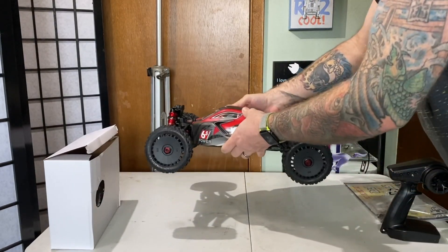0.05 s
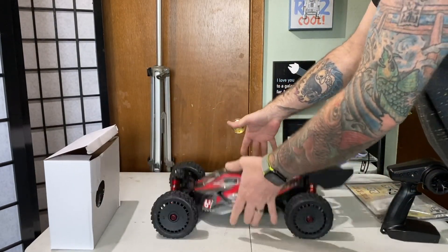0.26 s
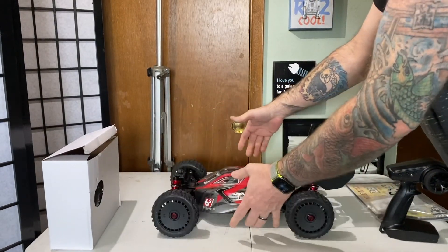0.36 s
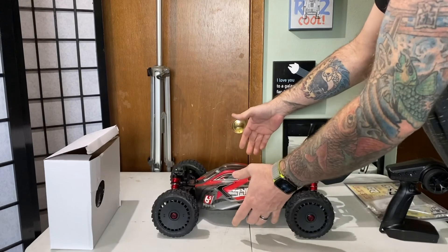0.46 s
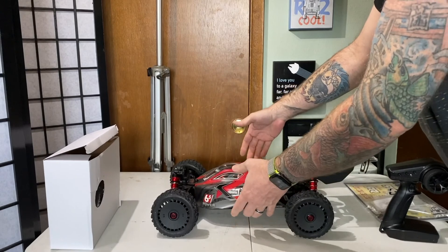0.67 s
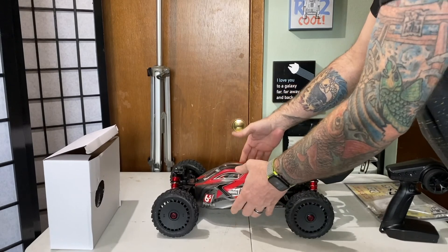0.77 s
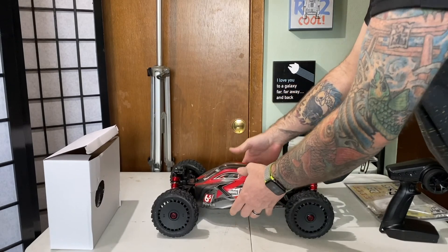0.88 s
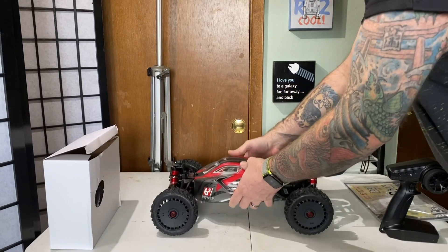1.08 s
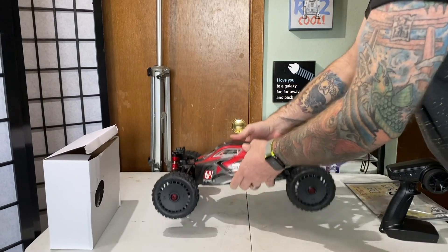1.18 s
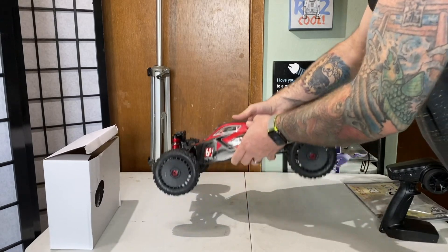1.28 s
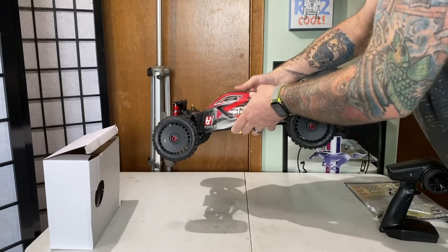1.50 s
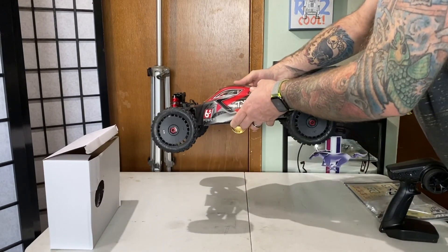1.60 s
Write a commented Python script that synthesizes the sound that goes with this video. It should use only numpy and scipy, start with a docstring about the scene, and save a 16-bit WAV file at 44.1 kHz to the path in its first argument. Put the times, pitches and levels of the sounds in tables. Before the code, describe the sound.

A metal-bodied toy car drops onto a table with a loud clattering thump in a small room

```python
"""In a small room, a metal-bodied toy car slides out of two hands and lands on a table.
Hard contacts ring its chassis modes, soft tyre pushes excite the table top, and loose parts chatter.
The hands then grip it with ticks, knocks and granular rubbing and lift it away, over air noise and fan hum.
Impacts are forces convolved with decaying noise or fed to resonators; the landing overloads the microphone."""
import sys
import numpy as np
from scipy import signal
from scipy.io import wavfile
from scipy.ndimage import uniform_filter1d, minimum_filter1d

SR = 44100
rng = np.random.default_rng(int(sys.argv[2]) if len(sys.argv) > 2 else 0)


def int16_out(signal):
    """Quantize to a 16-bit WAV file."""
    q = np.round(np.clip(np.atleast_2d(signal).T, -1, 1) * 32767)
    wavfile.write(sys.argv[1], SR, q.astype(np.int16))


N = 72765


def from_db(db):
    """Logarithmic level: 20 dB is a factor of ten in amplitude."""
    return 10 ** (np.asarray(db) / 20)


def seconds():
    """Uniform sampling: the time of every sample in seconds."""
    return np.arange(N) / SR


def at_hz(points, hz):
    """Logarithmic pitch scale: interpolate a table over log frequency."""
    f, v = np.transpose(points)
    return np.interp(np.log(hz), np.log(f), v)


def fade(t, t60):
    """Exponential decay: the level falls by 60 dB in t60 and is full before time zero."""
    return np.exp(-np.log(1000) * np.maximum(t, 0) / t60)


def unit(x):
    """Energy normalisation: scale the sum of squares to one."""
    return x / np.sqrt(np.sum(x ** 2) + 1e-30)


def bands(colour, pair):
    """Band analysis: split two unrelated white signals into (Hz, amplitude share, band)."""
    step = np.linspace(0, 1, 37)
    edges = 22 + 17000 * step ** 3 + 700 * step  # Hz; relatively narrower towards the treble
    centres = np.sqrt(edges[1:] * edges[:-1])
    # a density per Hz becomes a band amplitude through the root of the bandwidth
    shares = unit(from_db(at_hz(colour, centres)) * np.sqrt(np.diff(edges)))
    out = []
    for k, (hz, share) in enumerate(zip(centres, shares)):
        bandpass = signal.butter(2, edges[k:k + 2], "band", fs=SR, output="sos")
        # neighbouring bands take different sources
        out.append((hz, share, signal.sosfilt(bandpass, pair[k % 2] + 1e-18)))
    return out


def coloured(colour, pair):
    """Spectral shaping: sum the weighted bands to a signal of rms about 1."""
    return np.sqrt(N) * sum(share * unit(band) for hz, share, band in bands(colour, pair))


def clicks(rows):
    """Ideal impulse: one single-sample force for each (s, dB)."""
    force = np.zeros(N)
    for s, db in rows:
        force[int(np.clip(s * SR, 0, N - 1))] += from_db(db)
    return force


def pushes(rows):
    """Finite contact time: one smooth push for each (s, dB, contact s), duller when longer."""
    force = np.zeros(N)
    for s, db, contact_s in rows:
        age = np.maximum(np.arange(N) - int(s * SR), 0) / (contact_s * SR)  # in contact times
        push = age * np.exp(-2 * np.pi * np.minimum(age, 20))
        force += from_db(db) * push / push.sum()
    return force


def ring(force, modes):
    """Modal superposition: a force drives damped resonators (Hz, dB, t60 s) of alternating sign."""
    out = np.zeros(N)
    for k, (hz, db, t60) in enumerate(modes):
        r = fade(1 / SR, t60)
        w = 2 * np.pi * hz / SR
        mode = signal.lfilter([0, np.sin(w)], [1, -2 * r * np.cos(w), r * r], force + 1e-18)
        out += (-1) ** k * from_db(db) * mode
    return out


# reverberation time of the room by frequency: f/Hz, t60/s
ROOM_T60 = [(60, 0.22), (250, 0.39), (1000, 0.23), (3000, 0.27), (8000, 0.22), (15000, 0.16)]
ROOM_BUILD_S = 0.016  # time constant with which the reverberation grows
CRACK_T60_S = 0.0038


def burst(force, colour, t60, room_db, crack=0):
    """Impulse response: dense damped modes as decaying noise, with a crack and a banded room tail."""
    t = seconds()[:N // 3]
    room = from_db(room_db) * (1 - np.exp(-t / ROOM_BUILD_S))
    direct = fade(t, t60) + crack * fade(t, CRACK_T60_S)
    answer = 0
    for hz, share, band in bands(colour, rng.standard_normal((2, 2 * len(t)))):
        envelope = np.hypot(direct, room * fade(t, at_hz(ROOM_T60, hz)))
        settled = band[len(t):]  # skip the band filter's own onset
        answer = answer + share * np.linalg.norm(envelope) * unit(settled * envelope)
    return signal.fftconvolve(force, answer)[:N]


GRAIN_SPREAD_DB = 3.5


def grains(per_s):
    """Stick-slip friction: random slips of uneven size and either sign, about unit strength each."""
    excess = np.minimum(rng.exponential(1, N), 4) - 1
    sizes = from_db(GRAIN_SPREAD_DB * excess) * rng.choice([-1, 1], N)
    return sizes * (rng.random(N) < per_s / SR)


def friction(colour, per_s):
    """Granular excitation: a steady stream of coloured slips, rms about 1."""
    return coloured(colour, [grains(per_s), grains(per_s)])


# hard contacts of chassis and suspension in the landing: t/s, relative level/dB
CLACKS = [(0.222, -19), (0.232, -15.5), (0.238, -4), (0.2422, 8.5), (0.2445, 3.5), (0.2525, -4),
          (0.257, 3.5), (0.263, -39)]
# spectrum of the clack: f/Hz, relative level/dB per Hz
CLACK_COLOUR = [(200, -14.5), (800, 3.5), (1900, -10), (2600, 3.5), (3500, 1.5), (4400, -3), (5600, -14),
                (8500, -29.5), (15000, -41)]
CLACK_DB, CLACK_T60_S, CLACK_ROOM_DB, CLACK_CRACK_DB = -11, 0.055, -15, -5
# chassis modes: f/Hz, relative level/dB, t60/s
CHASSIS_MODES = [(1648, 0, 0.28), (2190, -10.5, 0.25), (2703, 2, .16), (2789, -13.5, 0.078),
                 (3256, -17.5, .2), (3034, 1, 0.067), (3740, -17, 0.6), (4280, -26.5, .2),
                 (4290, -19.5, 0.084), (4770, -27, 0.33), (6640, -25.5, .18)]
CHASSIS_DB = -32.5


def chassis():
    """Impulsive excitation: hard contacts crack and set the modes of the metal frame ringing."""
    force = clicks(CLACKS)
    clack = burst(force, CLACK_COLOUR, CLACK_T60_S, CLACK_ROOM_DB, from_db(CLACK_CRACK_DB))
    return from_db(CLACK_DB) * clack + from_db(CHASSIS_DB) * ring(force, CHASSIS_MODES)


# tyres hit the table, the springs bottom out and the car settles: t/s, relative level/dB, contact/s
THUMPS = [(0.246, 8, 0.00069), (0.2535, -11, 0.0008), (0.264, 7, 0.0016), (0.275, 0, 0.0015),
          (0.286, -7, 0.0011), (0.302, 0, .0025), (0.338, -19, .001), (0.357, -7.5, 0.0013),
          (0.372, -12, 0.00053), (0.388, -23.5, 0.00091), (0.409, -15, .0012)]
# spectrum of the boom: f/Hz, relative level/dB per Hz
THUMP_COLOUR = [(30, -12.5), (70, -11), (140, 1), (260, -6.5), (400, -7.5), (800, -9.5), (1300, -12),
                (2500, -15), (6000, -55)]
THUMP_DB, THUMP_T60_S, THUMP_ROOM_DB = -8, 0.083, -7
# table top modes: f/Hz, relative level/dB, t60/s
TABLE_MODES = [(144.2, -6.5, 0.39), (178.2, -19.5, 0.21), (224.2, -4.5, 0.24), (304.3, -6.5, 0.46),
               (319.6, -16, .3), (444.2, -14.5, .3), (552.9, -10.5, 0.28), (685, -14.5, 0.093),
               (770.4, -9, 0.22), (834.6, -5.5, 0.2), (899.5, -7, 0.16), (1103, -15, 0.15)]
TABLE_DB = -13.5
# the car's full weight heaves the table, then rocks on its springs: t/s, relative level/dB, contact/s
SLAM = [(0.2635, -1.5, 0.0044), (0.405, -15.5, 0.013)]
# deep modes of the table on its legs: f/Hz, relative level/dB, t60/s
TABLE_DEEP_MODES = [(52, -6.5, 0.23), (81.1, -6, .27), (127.7, -1, 0.15)]


def table():
    """Plate resonance: soft tyre pushes boom in the table top; the car's weight heaves the table."""
    force = pushes(THUMPS)
    boom = from_db(THUMP_DB) * burst(force, THUMP_COLOUR, THUMP_T60_S, THUMP_ROOM_DB)
    top = from_db(TABLE_DB) * ring(force, TABLE_MODES)
    heave = ring(pushes(SLAM), TABLE_DEEP_MODES)
    return boom + top - heave


# spectrum of the rattle: f/Hz, relative level/dB per Hz
RATTLE_COLOUR = [(150, 0.5), (450, 8), (1200, 5.5), (2000, 0.5), (3500, -3), (5600, -8), (9000, -9.5),
                 (11000, -23.5), (15000, -15)]
RATTLE_START_S, RATTLE_PER_S, RATTLE_T60_S = .25, 410, 0.25
RATTLE_END_S, RATTLE_STOP_T60_S = 0.39, .1  # a further decay from here on
RATTLE_DB, RATTLE_SPREAD_DB = -3.5, 13  # strongest hit before the decays, range below it
RATTLE_GRAIN_T60_S, RATTLE_ROOM_DB = 0.047, -11


def rattle():
    """Repeated impacts: loose parts chatter ever more weakly and stop as the springs settle."""
    t = seconds()
    age = t - RATTLE_START_S
    shake = (age > 0) * fade(age, RATTLE_T60_S) * fade(t - RATTLE_END_S, RATTLE_STOP_T60_S)
    draws = rng.random((300, 2))
    # one hit at a random moment in each equal slot
    times = RATTLE_START_S + (np.arange(len(draws)) + draws[:, 0]) / RATTLE_PER_S
    levels = RATTLE_DB - RATTLE_SPREAD_DB * draws[:, 1]
    force = shake * clicks(zip(times, levels)) * rng.choice([-1, 1], N)
    return burst(force, RATTLE_COLOUR, RATTLE_GRAIN_T60_S, RATTLE_ROOM_DB)


# fingers and loose parts tick on the shell: t/s, relative level/dB, contact/s
TICKS = [(0.1262, -21.5, 0.0003), (0.159, -19, 0.00036), (0.165, -30, 0.00055), (0.212, -28, 0.000032),
         (0.675, -34, 0.000023), (0.7124, -25.5, 0.00027), (0.8293, -41, 0.000035),
         (0.8565, -24.5, 0.000055), (0.863, -49, 0.000041), (0.9715, -26.5, 0.00009),
         (0.978, -29.5, 0.00058), (1.0593, -38, 0.000091), (1.1431, -29.5, 0.00023), (1.185, -29, 0.00042),
         (1.3182, -30.5, 0.00028)]
# spectrum of the ticks: f/Hz, relative level/dB per Hz
TICK_COLOUR = [(200, -26.5), (1200, -7.5), (2000, -7), (2800, -3.5), (4800, -3.5), (6300, -7), (8300, -1.5),
               (10500, -11), (15000, -12.5)]
TICK_DB, TICK_T60_S, TICK_ROOM_DB, TICK_CRACK_DB = -4, 0.069, -4.5, -7.5
# modes of the thin shell: f/Hz, relative level/dB, t60/s
SHELL_MODES = [(1644, -4, 0.249), (1930, -1.5, 0.094), (2163, 1.5, 0.1), (4450, -7.5, .14),
               (5150, -8, 0.15), (5540, -12.5, 0.14), (7860, -5, .08)]
TICK_RING_DB = -20
# the gripped shell creaks faintly as the car is lifted, one row: start t/s, length/s, relative level/dB
CREAK = (1.145, 0.058, -38.5)
CREAK_SLIPS_PER_S = 300


def shell():
    """Thin-shell resonance: bright ticks as the hands let go and regrip; slips in the grip creak."""
    t = seconds()
    force = pushes(TICKS)
    ticks = burst(force, TICK_COLOUR, TICK_T60_S, TICK_ROOM_DB, from_db(TICK_CRACK_DB))
    start, length, db = CREAK
    slips = from_db(db) * grains(CREAK_SLIPS_PER_S) * (t > start) * (t < start + length)
    return from_db(TICK_DB) * ticks + from_db(TICK_RING_DB) * ring(force + slips, SHELL_MODES)


# fingertips knock dully on the hollow body: t/s, relative level/dB
KNOCKS = [(0.111, -30.5), (0.128, -13), (0.168, -25), (0.875, -26.5), (0.918, -28), (0.928, -17.5),
          (1.0735, -23.5), (1.128, -25.5), (1.18, -28.5), (1.228, -28), (1.324, -30)]
# spectrum of the knocks: f/Hz, relative level/dB per Hz
KNOCK_COLOUR = [(100, -13.5), (280, 0.5), (450, 8.5), (750, 0.5), (1300, -5.5), (3000, -31), (15000, -25.5)]
KNOCK_DB, KNOCK_T60_S, KNOCK_ROOM_DB = -14, 0.028, -3
# modes of the hollow body: f/Hz, relative level/dB, t60/s
BODY_MODES = [(380, -15.5, 0.04), (469.3, 2.5, 0.19), (552.5, -2.5, 0.16), (618, -9, 0.22),
              (748, -7.5, 0.2)]
BODY_DB = -19


def body():
    """Hollow-body resonance: fingertip knocks excite low, strongly damped modes."""
    force = clicks(KNOCKS)
    knock = burst(force, KNOCK_COLOUR, KNOCK_T60_S, KNOCK_ROOM_DB)
    return from_db(KNOCK_DB) * knock + from_db(BODY_DB) * ring(force, BODY_MODES)


# palms slide on the body and tyres: t/s, length/s, level/dB
RUBS = [(0.164, 0.016, -32), (0.204, .035, -34.5), (0.891, 0.034, -44), (0.91, 0.08, -41.5),
        (1.057, 0.095, -53.5), (1.228, 0.073, -63), (1.313, 0.029, -45.5)]
# spectrum of the rubbing: f/Hz, relative level/dB per Hz
RUB_COLOUR = [(100, -10.5), (280, -26.5), (450, 8), (750, 0.5), (1500, -3), (3000, -13), (8000, -34),
              (15000, -57)]
RUB_ATTACK_S, RUB_T60_S, RUB_GRAINS_PER_S = .003, 0.14, 1800
# skin brushing over the shell: t/s, relative level/dB
BRUSH = [(0.08, -77), (0.12, -50), (0.135, -49), (0.23, -42), (0.42, -67.5), (0.668, -54.5), (0.682, -51),
         (0.73, -49.5), (0.77, -58), (0.85, -55.5), (0.93, -48.5), (0.99, -50), (1.04, -53.5),
         (1.16, -48.5), (1.23, -52), (1.31, -52.5), (1.345, -47.5), (1.42, -55.5), (1.5, -63.5),
         (1.65, -69.5)]
# spectrum of the brushing: f/Hz, relative level/dB per Hz
BRUSH_COLOUR = [(200, -0.5), (700, 1), (1800, 3.5), (4000, -1.5), (6000, -4.5), (8500, -4), (10500, -10.5),
                (15000, -12)]
BRUSH_GRAINS_PER_S, BRUSH_DB = 3000, 3.5


def hands():
    """Sliding friction: dull rubs on the hollow body and a bright brushing of skin."""
    t = seconds()
    pressure = np.zeros(N)
    for s, length, db in RUBS:
        attack = np.clip((t - s) / RUB_ATTACK_S, 0, 1)
        pressure += from_db(db) * attack * fade(t - s - length, RUB_T60_S)
    rubbing = pressure * friction(RUB_COLOUR, RUB_GRAINS_PER_S)
    brush_level = from_db(BRUSH_DB + np.interp(t, *np.transpose(BRUSH)))
    return rubbing + brush_level * friction(BRUSH_COLOUR, BRUSH_GRAINS_PER_S)


# spectrum of the moving air: f/Hz, relative level/dB per Hz
AIR_COLOUR = [(25, -3), (50, -6), (110, 0), (180, -4), (250, -13), (320, -11), (430, -19), (560, -18),
              (880, -22.5), (1700, -27), (4000, -34.5), (8000, -40), (15000, -46.5)]
AIR_DB = -45
# fan hum partials: f/Hz, relative level/dB
HUM = [(55, -51), (93, -43), (168, -58.5), (333, -58)]
# level of the hum, which dips briefly: t/s, relative level/dB
HUM_LEVEL = [(0, 1.5), (0.5, 0), (0.9, 0), (1.3, -1), (1.42, -14), (1.51, 1), (1.65, -5.5)]
HUM_WAVER = 0.083  # share of random change in amplitude and phase


def room_tone():
    """Stationary noise and narrow-band tones: moving air and a wavering fan hum."""
    t = seconds()
    out = from_db(AIR_DB) * coloured(AIR_COLOUR, rng.standard_normal((2, N)))
    hum_level_db = np.interp(t, *np.transpose(HUM_LEVEL))
    for hz, db in HUM:
        knots = rng.standard_normal(size=24) + 1j * rng.standard_normal(size=24)
        waver = 1 + HUM_WAVER * np.interp(t, np.linspace(0, t[-1], len(knots)), knots)
        tone = np.real(waver * np.exp(2j * np.pi * (hz * t + rng.random())))
        out += np.sqrt(2) * from_db(db + hum_level_db) * tone
    return out


def scene():
    """Linear superposition: car, table, hands and room add at one microphone."""
    return (chassis() + table() + rattle() + shell() + body() + hands() + room_tone())[None]


LIMIT_DB, LIMIT_S = 4.5, 0.0027  # re full scale; length of the gain window


def limiter(x):
    """Gain control: hold the lowest gain needed nearby and smooth it, pulling down the highest peaks."""
    size = int(LIMIT_S * SR)
    wanted = np.minimum(1, from_db(LIMIT_DB) / (np.abs(x) + 1e-9))
    return x * uniform_filter1d(minimum_filter1d(wanted, size), size)


MIC_DIP_HZ, MIC_DIP_Q, MIC_DIP_SHARE = 10660, 4.1, 0.73  # share: 1 would be a full notch
OVERLOAD = .96  # clipping amplitude
CUTOFF_HZ = 16000


def record(dry):
    """Overload distortion: after a treble dip the landing is limited and still clips; the top is cut."""
    notched = signal.lfilter(*signal.iirnotch(MIC_DIP_HZ, MIC_DIP_Q, fs=SR), dry)
    heard = limiter(dry + MIC_DIP_SHARE * (notched - dry))
    clipped = np.clip(heard, -OVERLOAD, OVERLOAD)
    lowpass = signal.ellip(10, .1, 70, CUTOFF_HZ, fs=SR, output="sos")
    return signal.sosfilt(lowpass, clipped)


dry = scene()
out = record(dry)
int16_out(out)
```